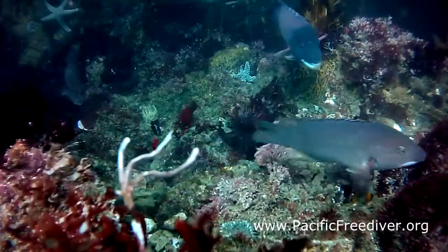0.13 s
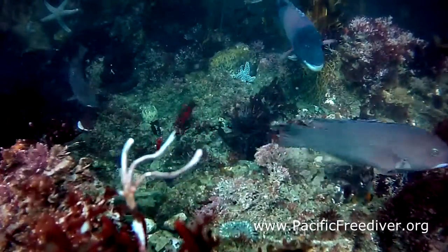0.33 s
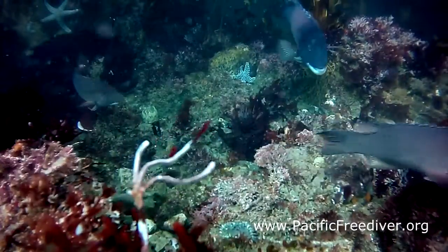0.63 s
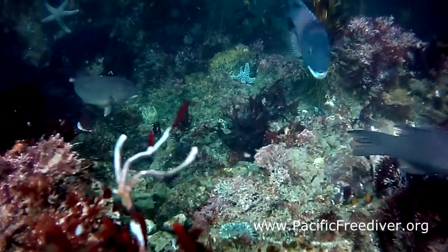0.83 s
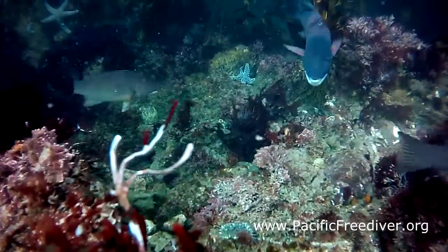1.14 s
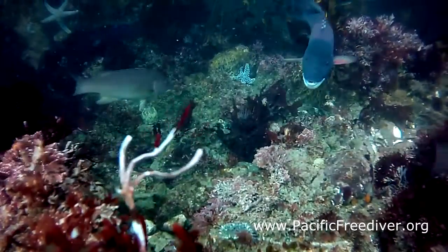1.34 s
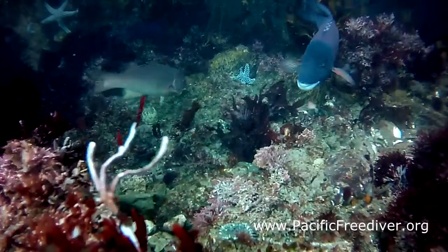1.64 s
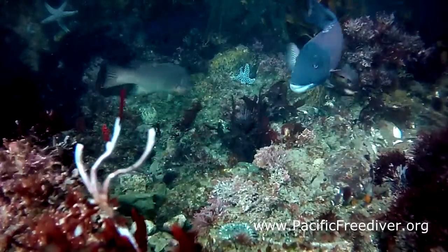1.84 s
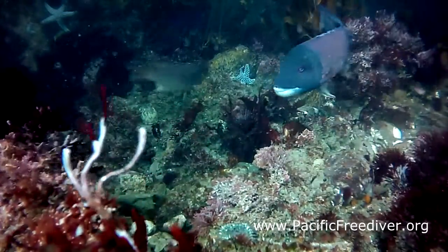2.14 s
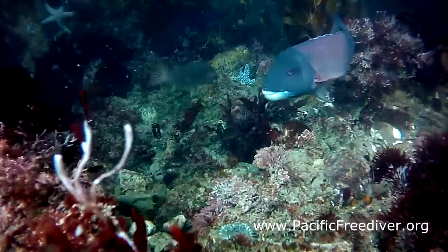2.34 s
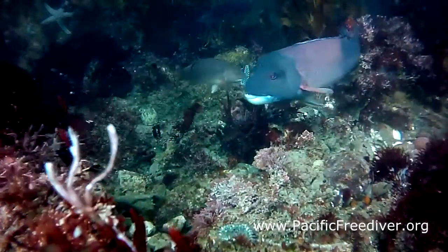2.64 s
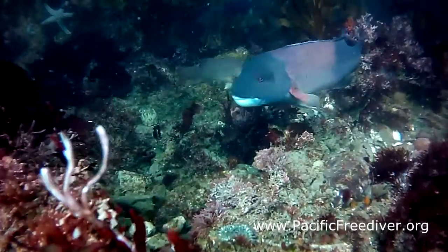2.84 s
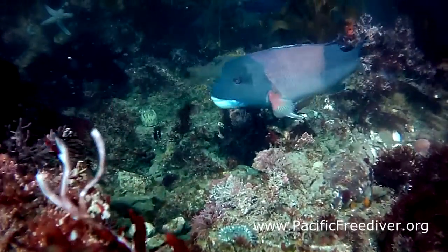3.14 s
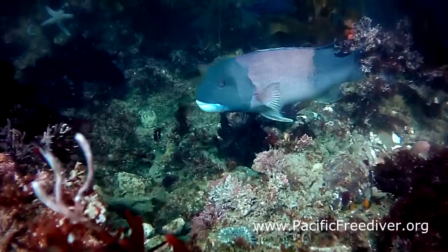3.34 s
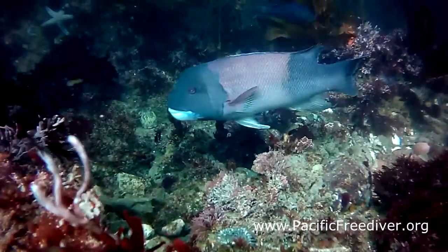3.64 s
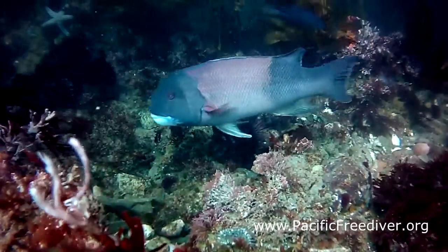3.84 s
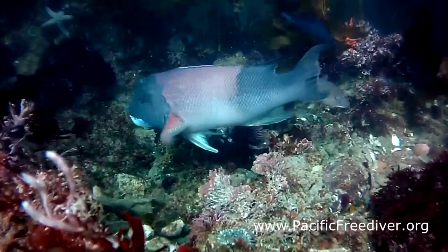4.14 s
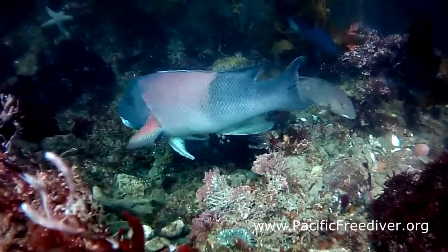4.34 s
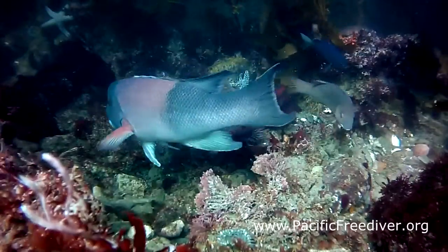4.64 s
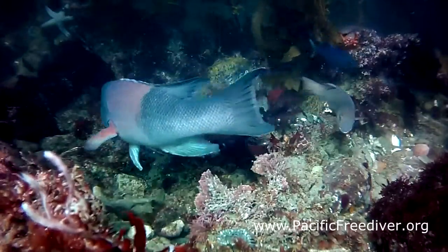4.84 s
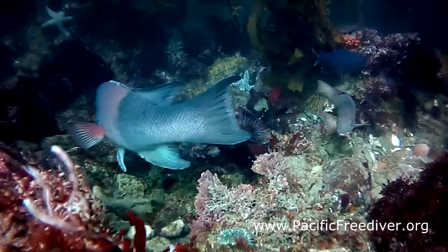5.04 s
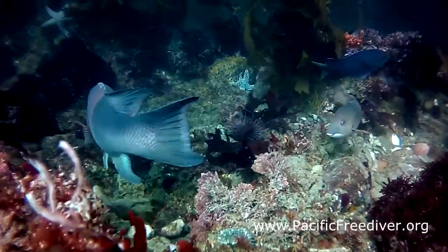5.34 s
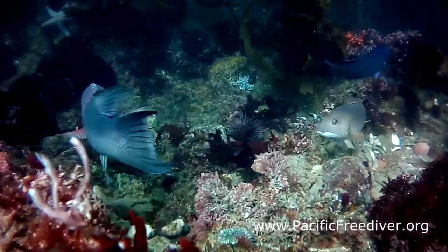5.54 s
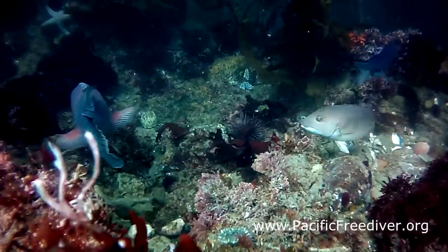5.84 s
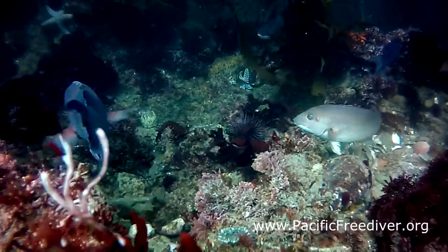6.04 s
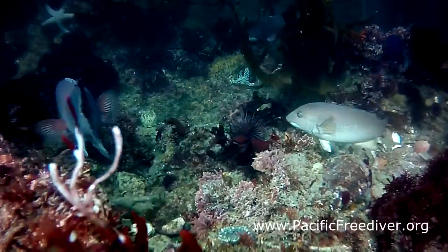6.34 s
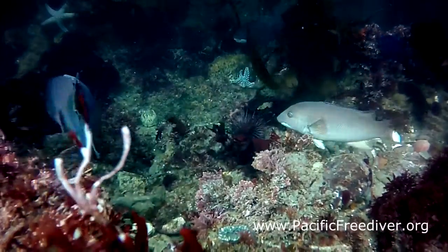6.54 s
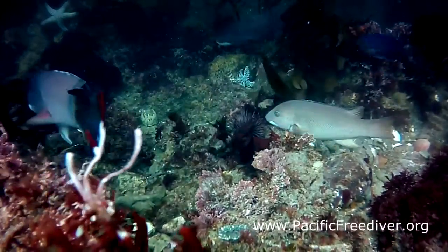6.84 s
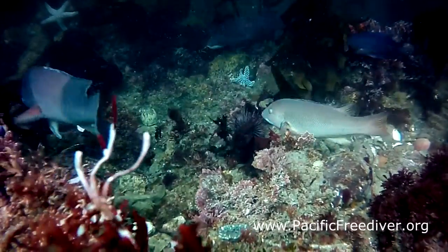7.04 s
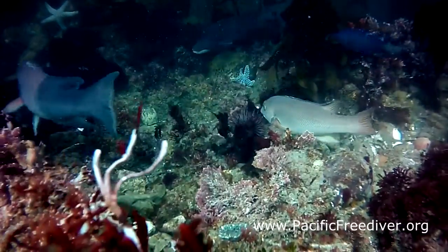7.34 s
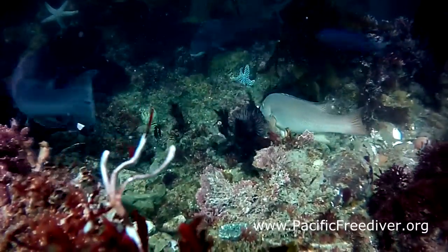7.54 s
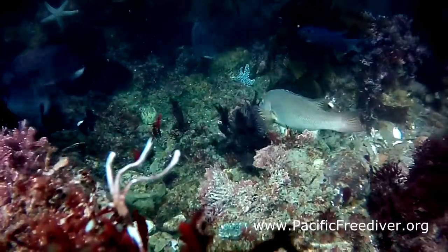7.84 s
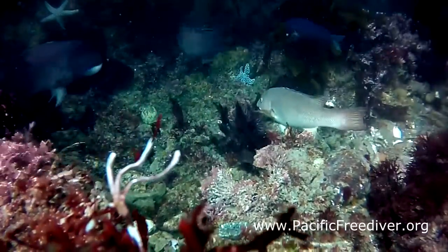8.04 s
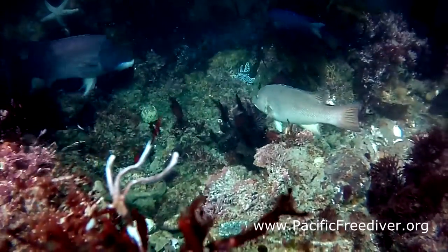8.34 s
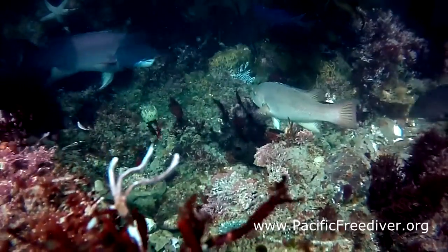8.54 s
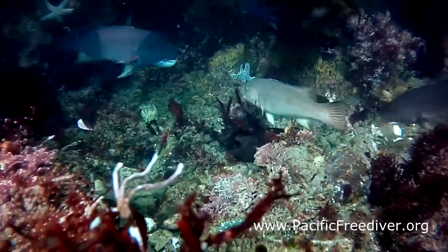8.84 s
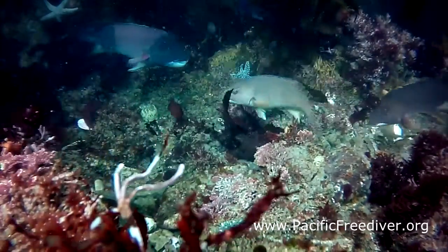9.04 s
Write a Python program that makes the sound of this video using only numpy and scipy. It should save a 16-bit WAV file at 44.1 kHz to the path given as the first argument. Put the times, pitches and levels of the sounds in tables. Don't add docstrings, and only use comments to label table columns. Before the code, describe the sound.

Underwater at a rocky reef, heard through a sealed camera housing for a little over nine seconds. A quiet bed of low water rumble, soft hiss and a faint, slightly blurred high whine runs throughout, beneath the dense grainy crackle of distant snapping shrimp, whose level drifts up and down. From the start, fish make short hollow pops, rounded and low-mid in pitch, at irregular intervals, with a stronger one near 3.4 s. Nearer shrimp snaps are dry, bright clicks that ring the housing briefly and scatter off rock and surface. Strong snaps stand out at about 0.7 and 2.6 s. At 5.2 s the nearest cracks so loudly that it clips, with fish pops close around it. A pair of pops leads into the deepest, heaviest fish thump at 7.4 s, with lesser thumps around 8 s. Another strong snap comes at 8.6 s, and crackling continues to the end.

```python
import sys
import numpy as np
from scipy import signal
from scipy.fft import rfft, irfft, next_fast_len
from scipy.io import wavfile

SR = 44100
rng = np.random.default_rng(int(sys.argv[2]) if len(sys.argv) > 2 else 0)


def amplitude_ratio(level_db):
    exponent = np.asarray(level_db, float) / 20
    return 10 ** exponent


def unload_audio(sound):
    columns = np.transpose(np.atleast_2d(sound))
    steps = np.round(np.clip(columns, -1, 1) * 32767)
    wavfile.write(sys.argv[1], SR, steps.astype(np.int16))


N = 405700

# frequency_hz, density_db (per Hz)
FLOOR_SPECTRUM = [
    (12, -20),
    (20, -2.5),
    (237, -14),
    (502, -13),
    (627, -21.5),
    (851, -25),
    (2590, -30.5),
    (3510, -27),
    (4260, -29.5),
    (15300, -39.5),
]
FLOOR_DB = -50
WHINE_HZ, WHINE_WANDER_HZ, WHINE_DB = 4900, 90, [-63, -74.5, -73.5]

# start_s, level_db, low_share_db
CHORUS_LEVELS = [(0.0, -49.5, 4), (0.46, -57, -1), (1.05, -56.5, 6), (1.95, -53, 3.5), (2.38, -58, 3.5),
                 (2.87, -53.5, 9.5), (3.33, -55.5, 0.5), (3.75, -50, 1.5), (4.48, -57, 6.5),
                 (5.1, -54, 8.5), (5.5, -58, 5), (5.79, -55.5, 5.5), (7.3, -54.5, 6.5), (8.12, -55, 3),
                 (8.76, -53.5, 3.5), (9.2, -59.5, 11.5)]

# start_s, peak_db, pitch_hz, decay_cycles
FISH_POPS = [(0.024, -28, 513, 9.7), (0.537, -33, 485, 8.1), (1.061, -33.5, 366, 6.5),
             (1.54, -31.5, 415, 2.8), (1.76, -33.5, 526, 8.1), (2.132, -29.5, 379, 9.6),
             (2.183, -30.5, 510, 5.5), (2.691, -31, 510, 6.4), (3.378, -22.5, 454, 5.5),
             (3.567, -35.5, 880, 5.9), (3.717, -27, 476, 8.8), (3.88, -34, 387, 3.1),
             (4.228, -35, 480, 11.6), (4.346, -31.5, 510, 5.3), (4.786, -28, 360, 3.4),
             (4.912, -35, 365, 6.6), (5.212, -25, 470, 8.2), (5.305, -37, 420, 9.3), (5.622, -31, 480, 11),
             (5.827, -31, 393, 6.9), (6.338, -29.5, 477, 7.1), (6.788, -27, 490, 10.6),
             (6.994, -30, 810, 9.9), (7.309, -24, 343, 2.6), (7.409, -27.5, 348, 3.2),
             (7.846, -34, 503, 7.7), (7.88, -34, 333, 5.0), (7.979, -33, 252, 6.1), (8.391, -36, 490, 12),
             (8.415, -29.5, 415, 5.2)]
# start_s, peak_db, pitch_hz, decay_cycles
FISH_THUMPS = [(0.936, -41.5, 115, 2.8), (1.653, -40, 212, 6.2), (1.946, -45, 146, 4.0),
               (2.838, -43, 108, 3.5), (3.362, -41, 246, 5.6), (3.708, -37, 261, 6), (5.008, -35, 162, 2.2),
               (5.208, -33, 122, 2.6), (7.399, -22, 113, 3.8), (7.437, -37, 100, 3), (8.004, -37, 80, 3),
               (7.798, -33.5, 235, 3.1), (7.97, -27, 108, 3.3), (8.405, -32.5, 228, 3.8)]
SMALL_FISH_TIMES = [0.669, 1.042, 1.659, 1.841, 1.859, 4.662, 5.349, 6.15, 7.289, 7.607]
LARGE_FISH_TIMES = [0.422, 1.387, 2.025, 2.257, 3.226, 3.585, 5.025, 6.217, 8.594, 8.958]
SMALL_FISH, LARGE_FISH = (-37.5, 516, 6.8), (-38.5, 372, 5.8)   # peak_db, pitch_hz, decay_cycles

# start_s, peak_db, body_db, top_db (against the peak), extra_scatter_db
NEAR_SNAPS = [(0.0408, -20, -13.5, -24, 4), (0.5816, -27.5, -27, -21, 6), (0.6721, -25.5, -9.5, -27, 11),
              (0.7431, -9, -23.5, -21.5, 0.5), (1.271, -22, -9.5, -13.5, -1.5), (1.7355, -26, -15, -21, 5),
              (1.79, -28.5, -6.5, -18, 4.5), (1.8399, -29, -4.5, -17, 15), (1.9884, -26.5, -14, -12, -16),
              (2.0434, -29, -14.5, -18.5, 1), (2.5887, -7, -22, -24, 1), (3.547, -21.5, -22, -18, -5),
              (3.7628, -28, -11, -20, 2), (4.7429, -31.5, -0.8, -18, -3.5), (5.1625, 1.5, -19, -28, -9),
              (5.227, -24, -15, -13, -1), (6.3569, -22, -8, -22.5, 0.9), (6.995, -22, -14, -24, 3),
              (7.2275, -17.5, -11, -19.5, 6.5), (7.5621, -27, -14.5, -18, -6),
              (7.8474, -27, -1.7, -17, 0.5), (8.6438, -8.5, -23.5, -22, 0), (8.7376, -16.5, -8.5, -18, 1),
              (8.9413, -28, -10.5, -48, 6)]
# start_s, peak_db, body_db
HIDDEN_SNAPS = [(0.152, -28, -20), (0.276, -31.5, -10), (1.1693, -35, -7.5), (2.1636, -37.5, -10),
                (2.6135, -33, -37), (2.8523, -37.5, -8), (2.919, -35.5, -12), (2.981, -36.5, -4),
                (2.9966, -31.5, -20), (3.016, -31, -11), (3.268, -31, -17), (3.3433, -35, -14.5),
                (3.4995, -34.5, -5), (3.735, -32.5, -17), (4.8432, -31, -21), (5.6245, -33.5, -14.5),
                (5.885, -32, -16), (5.911, -31, -10.5), (5.9368, -30, -14), (6.563, -31.5, -12),
                (6.7722, -33, -15), (6.8097, -34, -21), (7.023, -31.5, -22), (7.0782, -33, -23),
                (7.2586, -31, -15), (7.665, -34, -10.5), (8.086, -33, -9.5), (8.1467, -29, -18.5),
                (8.2118, -33.5, -11), (8.3137, -32.5, -7)]
# start_s, peak_db, body_db
OPEN_SNAPS = [(0.4686, -35.5, -23), (0.5708, -38, -11), (0.8685, -43.5, -1.5), (0.9848, -37.5, -22),
              (1.041, -45, -1.5), (1.5257, -42, -11), (1.5924, -41, -9), (1.9734, -35.5, -9.5),
              (2.0124, -33, -22), (2.452, -37, -12), (2.4885, -37, -9), (2.6925, -38.5, -2.5),
              (2.788, -35, -27), (3.245, -41, -11), (3.6976, -38, -12), (4.0048, -37.5, -15),
              (4.205, -41, 1.2), (4.3033, -33.5, -16), (4.9006, -31, -15), (5.026, -32.5, -14),
              (5.5036, -35, -19), (5.5328, -31, -12.5), (6.127, -34, -13), (6.2412, -33.5, -19),
              (7.4833, -37.5, -10.5), (7.637, -36.5, -5), (7.7276, -34.5, -11.5), (8.52, -31, -14.5),
              (8.5694, -36.5, -14), (9.002, -34.5, -11)]
# start_s, peak_db
FAINT_SNAPS = [(0.781, -36.5), (0.803, -39), (1.473, -40.5), (2.076, -42), (2.2064, -39.5), (2.3991, -40.5),
               (2.6587, -39.5), (2.7706, -39.5), (2.9567, -41), (3.104, -41), (3.3639, -39), (4.324, -37.5),
               (4.4305, -39.5), (4.5284, -38), (4.62, -40), (4.994, -38.5), (5.712, -37), (5.7722, -41),
               (6.0761, -40.5), (6.312, -36), (6.458, -37), (6.7052, -40.5), (6.8626, -41), (7.11, -38),
               (7.213, -37), (7.2769, -37), (7.936, -37), (8.6068, -34), (8.7544, -31.5), (8.818, -37.5)]
FAINTEST_TIMES = [0.3234, 1.098, 1.135, 1.223, 1.3125, 1.56, 1.6887, 1.771, 1.92, 2.1441, 2.239, 2.7232,
                  2.8748, 3.0678, 3.128, 3.3238, 4.6, 4.966, 5.093, 5.152, 5.641, 5.6978, 6.0007, 6.1123,
                  6.151, 6.2519, 6.7282, 6.847, 7.3256, 9.0186]
FAINTEST_DB = -42.5
HIDDEN_COLOUR, OPEN_COLOUR = (-24, 2.5), (-15, 1.6)   # top_db, extra_scatter_db
FAINT_COLOUR = (-13, -17.5, -0.96)   # body_db, top_db, extra_scatter_db

# frequency_hz, width_hz, level_db
LOW_RESONANCES = [(369.4, 54, -2.5), (510.7, 74, -2), (836.6, 168, -3), (991, 160, -9)]
# frequency_hz, width_hz, level_db
BODY_RESONANCES = [(1236, 560, -1), (1724, 345, 3.5), (2385, 430, 2), (2776, 120, -4)]
# frequency_hz, width_hz, level_db
MAIN_RESONANCES = [(3274, 700, 4.2), (3620, 650, 5.8)]
# frequency_hz, width_hz, level_db
UPPER_RESONANCES = [(3994, 550, 0), (4520, 540, -2.5), (4970, 360, -5), (4260, 49, -12)]
# frequency_hz, width_hz, level_db
TOP_RESONANCES = [(5500, 420, 11.5), (6285, 660, 3.5), (7680, 2100, -2.5), (8900, 1600, -8.5),
                  (9460, 1300, -7)]

CLAW_S, CLAW_DB = 0.00074, -14
SURFACE_S, SURFACE_DB = 0.0067, -15
REEF_T60_S, REEF_DB = 0.047, -23
LOW_PER_BODY, LOW_UNDER_BODY_DB = 1.15, -3


def unit(x):
    return x / np.sqrt(np.mean(x ** 2) + 1e-20)


def rumble_and_hiss():
    size = next_fast_len(N)
    hz = np.maximum(np.arange(size // 2 + 1) * SR / size, 5)
    floor_hz, floor_db = np.transpose(FLOOR_SPECTRUM)
    shape = amplitude_ratio(np.interp(np.log(hz), np.log(floor_hz), floor_db))
    noise = irfft(rfft(rng.standard_normal(size)) * shape, size)[:N]
    return amplitude_ratio(FLOOR_DB) * unit(noise)


def slow_noise():
    pole = np.exp(-2 * np.pi * 80.4 / SR)
    return unit(signal.lfilter([1], [1, -2 * pole, pole * pole], rng.standard_normal(N)))


def camera_whine():
    phase = 2 * np.pi * np.cumsum(WHINE_HZ + WHINE_WANDER_HZ * slow_noise()) / SR
    flicker = unit(amplitude_ratio(3.4 * slow_noise()))
    tones = sum(np.sqrt(2) * amplitude_ratio(db) * np.sin((k + 1) * phase) for k, db in enumerate(WHINE_DB))
    return flicker * tones


def resonate(x, hz, width_hz):
    r = np.exp(-np.pi * width_hz / SR)
    b = [(1 - r * r) / 2, 0, (r * r - 1) / 2]
    a = [1, -2 * r * np.cos(2 * np.pi * hz / SR), r * r]
    return signal.lfilter(b, a, x)


def ring_of(modes):
    click = np.eye(1, 2048)[0]
    ring = np.zeros(len(click))
    for k, (hz, width_hz, db) in enumerate(modes):
        wall = resonate(click, hz, width_hz)
        air = resonate(wall, hz, 1.015 * width_hz)
        ring += (-1) ** k * amplitude_ratio(db) * air
    return ring / np.max(np.abs(ring))


def housing(trains):
    groups = [LOW_RESONANCES, BODY_RESONANCES, MAIN_RESONANCES, UPPER_RESONANCES, TOP_RESONANCES]
    return sum(signal.fftconvolve(train, ring_of(modes))[:N] for train, modes in zip(trains, groups))


def far_snaps(per_s, spread_db, smear_s):
    size_db = 2 * spread_db * np.minimum(rng.exponential(1, N), 3.5)
    power = amplitude_ratio(size_db) * (rng.random(N) < per_s / SR)
    fade = np.exp(-1 / (smear_s * SR))
    envelope = np.sqrt(signal.lfilter([1], [1, -fade], power + 1e-12))
    grains = rng.standard_normal(N) * amplitude_ratio(1.5 * rng.standard_normal(N))
    return unit(envelope * grains)


def shrimp_chorus():
    s, level_db, low_db = np.transpose(CHORUS_LEVELS)
    time_s = np.arange(N) / SR
    level_db = np.interp(time_s, s, level_db)
    low_db = np.interp(time_s, s, low_db)
    bed = far_snaps(800.0, spread_db=3.5, smear_s=0.0018)
    bed += amplitude_ratio(0.5) * far_snaps(45.0, spread_db=4.0, smear_s=0.0061)
    knocks = far_snaps(60.0, spread_db=3.5, smear_s=0.0035)
    ticks = far_snaps(30.0, spread_db=3.5, smear_s=0.0025)
    low = (amplitude_ratio(-7.5) * bed + knocks) * amplitude_ratio(low_db - 9.5)
    crisp = bed + amplitude_ratio(-3) * ticks
    trains = np.array([low, bed * amplitude_ratio(-6), bed, crisp * amplitude_ratio(-12.5), crisp * amplitude_ratio(-29)])
    return housing(amplitude_ratio(level_db - 17.5) * trains)


def bladder_pulse(hz, cycles):
    t = np.arange(round(3 * cycles / hz * SR)) / SR * hz
    wave = np.sin(2 * np.pi * t)
    wave += 0.38 * np.sin(2 * np.pi * 1.99 * t) * np.exp(-0.3 * t)
    wave += 0.29 * np.sin(2 * np.pi * 0.47 * t)
    wave *= t ** 1.11 * np.exp(-6.0 * t / cycles)
    return wave / np.max(np.abs(wave))


def fish_calls():
    calls = list(FISH_POPS) + list(FISH_THUMPS)
    calls += [(s, *SMALL_FISH) for s in SMALL_FISH_TIMES]
    calls += [(s, *LARGE_FISH) for s in LARGE_FISH_TIMES]
    echo_lags = rng.uniform(0.00669, 0.03, (len(calls), 3))
    out = np.zeros(N + SR)
    for (s, peak_db, hz, cycles), lags in zip(calls, echo_lags):
        wave = amplitude_ratio(peak_db + 5.0) * bladder_pulse(hz, cycles)
        for lag, echo_db in zip([0, *lags], [-4.5, -5.5, -20.5, -13.5]):
            start = round((s + lag) * SR)
            out[start:start + len(wave)] += amplitude_ratio(echo_db - 540 * lag) * wave
    return out[:N]


def snap_paths(tail_db, surface_db):
    t = np.arange(round(0.06 * SR)) / SR
    ragged_db = 2.1 * rng.standard_normal((len(tail_db), len(t)))
    out = rng.standard_normal(ragged_db.shape) * amplitude_ratio(tail_db[:, None] + ragged_db - 60 * t / REEF_T60_S)
    out *= 1 - np.exp(-t / 0.0011)
    out[:, 0] += amplitude_ratio(CLAW_DB)
    out[:, round(CLAW_S * SR)] -= 1
    out[:, round((CLAW_S + SURFACE_S) * SR)] += amplitude_ratio(surface_db)
    return out


def near_snaps():
    snaps = list(NEAR_SNAPS)
    snaps += [(*snap, *HIDDEN_COLOUR) for snap in HIDDEN_SNAPS]
    snaps += [(*snap, *OPEN_COLOUR) for snap in OPEN_SNAPS]
    snaps += [(*snap, *FAINT_COLOUR) for snap in FAINT_SNAPS]
    snaps += [(s, FAINTEST_DB, *FAINT_COLOUR) for s in FAINTEST_TIMES]
    snaps = np.array(snaps)
    peaks_db, scatter_db = snaps[:, 1], snaps[:, 4]
    tail_db = REEF_DB - 14.5 - 0.46 * peaks_db + scatter_db
    arrivals = snap_paths(tail_db, SURFACE_DB + np.minimum(scatter_db, 2))
    trains = np.zeros((5, N + arrivals.shape[1]))
    for (s, peak_db, body_db, top_db, _), arrival in zip(snaps, arrivals):
        low_db = LOW_PER_BODY * body_db + LOW_UNDER_BODY_DB
        upper_db = 0.3 * top_db + 0.11 * peak_db
        group_db = np.array([low_db + 8.5, body_db + 11.0, 3, upper_db + 5.5, top_db + 11.5])
        gains = amplitude_ratio(peak_db + group_db)
        gains /= np.sqrt(1 + 1.08 * np.sum(arrival[40:] ** 2))
        start = round(s * SR)
        trains[:, start:start + len(arrival)] += gains[:, None] * arrival
    return housing(trains[:, :N])


def scene():
    return (rumble_and_hiss() + camera_whine() + shrimp_chorus() + fish_calls() + near_snaps())[None, :]


def roll_off(x):
    return signal.sosfilt(signal.butter(12, 16340, fs=SR, output="sos"), x)


def record(dry):
    low_pass = signal.ellip(12, 0.5, 45, 15270, fs=SR, output="sos")
    cut = signal.sosfilt(low_pass, dry)
    mix = np.clip(cut + 0.0018, -1, 1)
    return roll_off(mix)


dry = scene()
out = record(dry)
unload_audio(out)
```